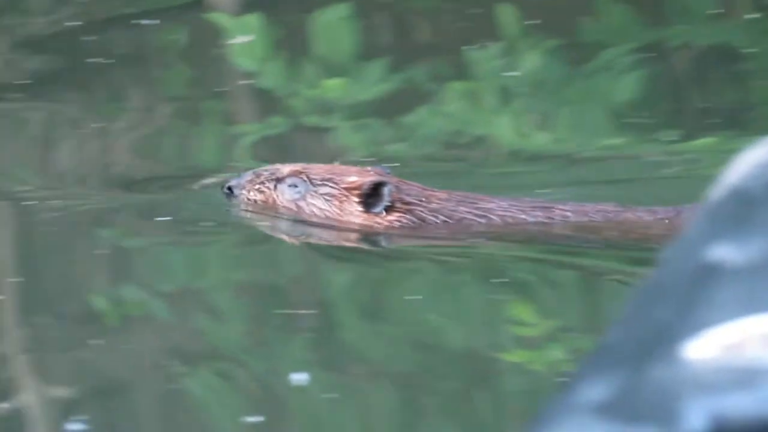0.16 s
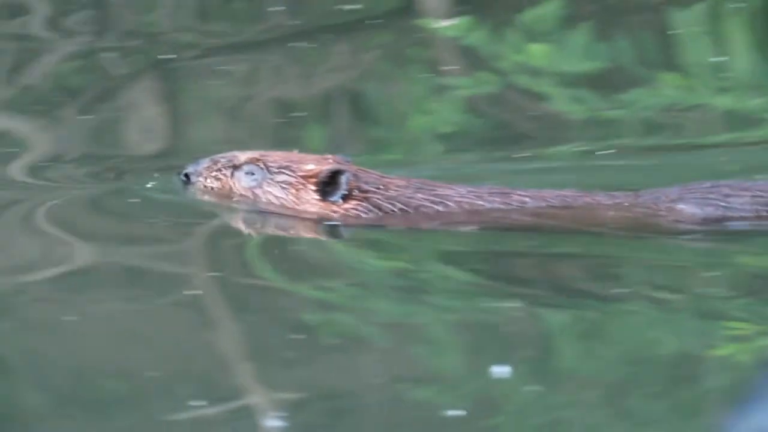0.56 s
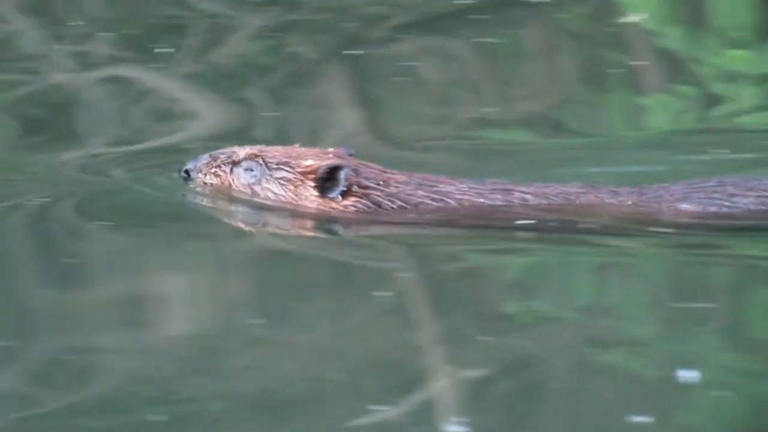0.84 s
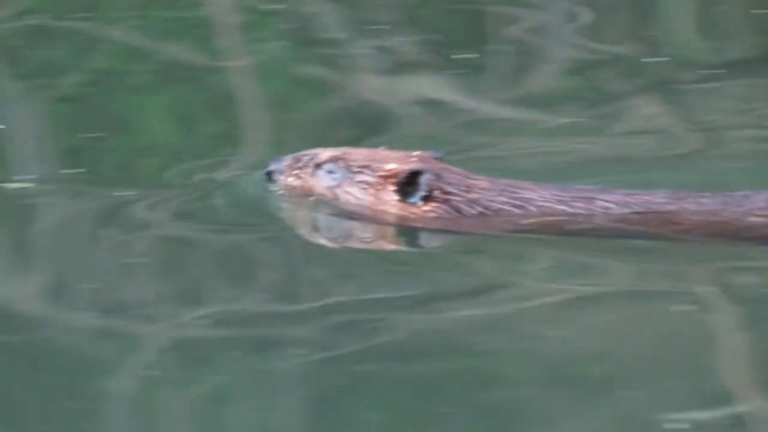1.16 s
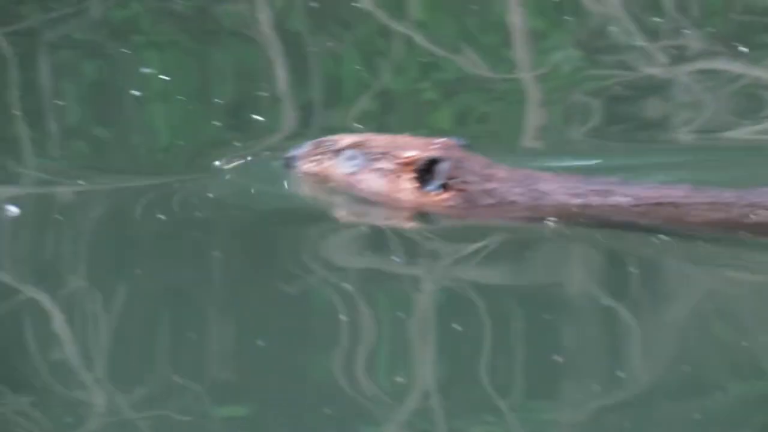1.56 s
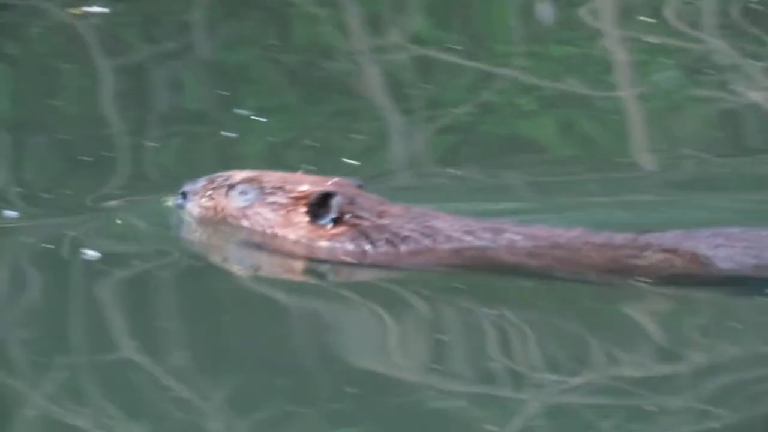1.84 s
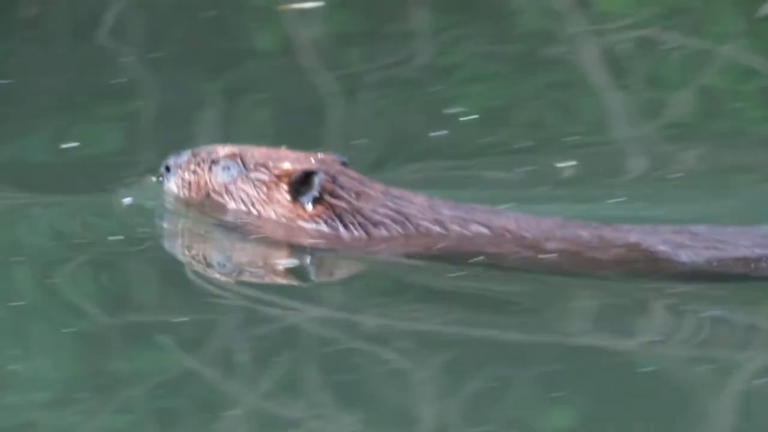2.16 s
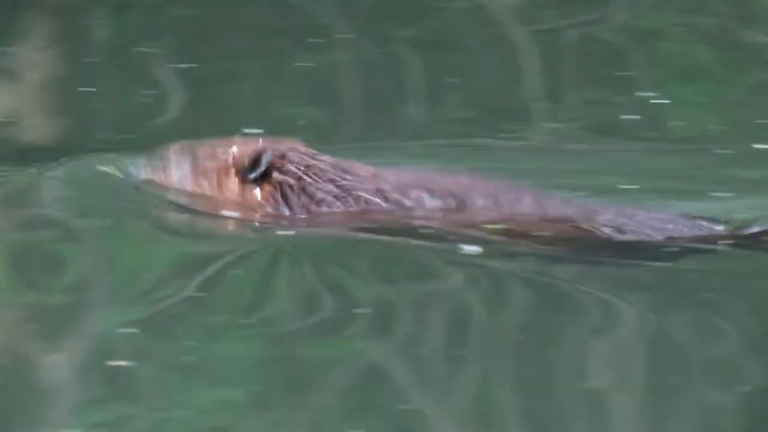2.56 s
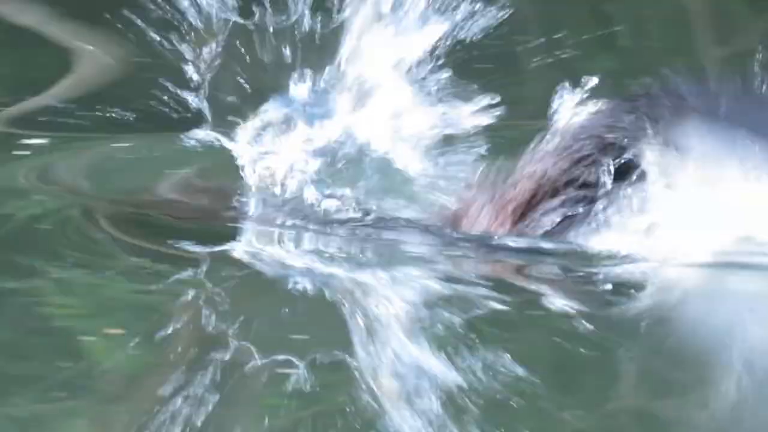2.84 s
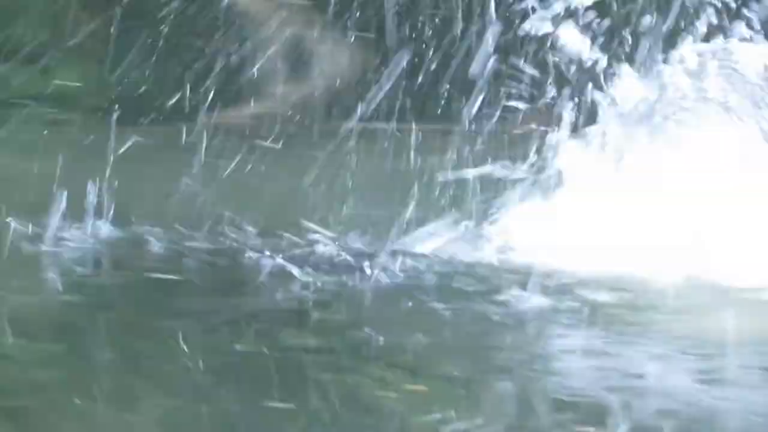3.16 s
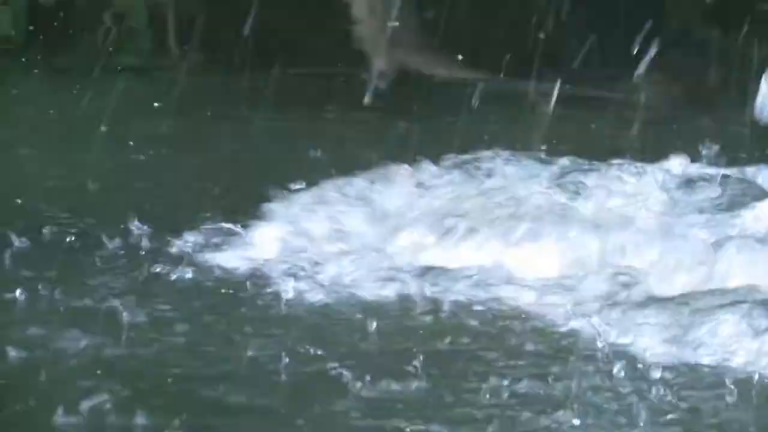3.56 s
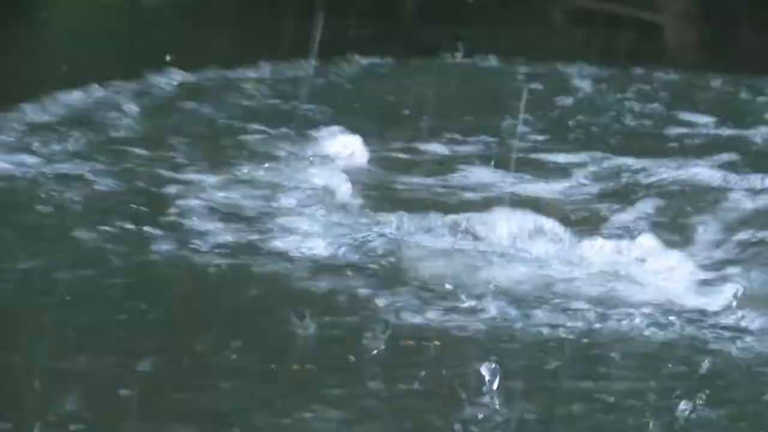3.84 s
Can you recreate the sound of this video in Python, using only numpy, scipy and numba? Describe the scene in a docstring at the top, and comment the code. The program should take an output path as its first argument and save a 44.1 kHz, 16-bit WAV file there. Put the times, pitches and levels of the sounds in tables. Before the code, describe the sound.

A beaver's tail-slap dive on a quiet wooded lake. Until 2.7 s only low hum, soft rumble and hiss, with faint quick bird phrases on the left at 0.7-1.9 s and a tiny water tick at 1.9. Light plops at 2.7, a gulping plunge at 2.9, a very loud, bright smack at 3.07, abruptly dropping; then drops patter and bubbling water swells at 3.45-3.9, thinning by 4.

```python
"""Quiet wooded lake: a beaver dives a few metres from a small camera. Its back breaks the surface, the body
plunges, the tail smacks, and thrown water rains back. Water is decaying sine grains over band noise.
Behind it: harmonic hum, a slowly swelling tone, shaped noise for distant rumble and microphone hiss,
and faint birds as short sines. The camera's limiter ducks the level after the smack."""
import sys
import numpy as np
from scipy import signal
from scipy.fft import rfft, irfft
from scipy.io import wavfile
from scipy.ndimage import uniform_filter1d
from numba import njit

SR = 44100
rng = np.random.default_rng(int(sys.argv[2]) if len(sys.argv) > 2 else 0)


def unload_wav(signal):
    """Save mono or channel-first audio to the path in sys.argv[1] as 16-bit WAV at rate SR, clipped to [-1, 1]."""
    wavfile.write(
        sys.argv[1],
        SR,
        np.round(np.clip(np.atleast_2d(signal).T, -1, 1) * 32767).astype(np.int16),
    )


def nominal_scale(level):
    """Amplitude ratio for a level in decibels (scalar or array-like)."""
    x = np.asarray(level, float) / 20
    return 10 ** x


N = 176400  # samples

# Table levels are relative: trims, pan, echo and limiter follow. Positive pan_db leans left.
# Single bubbles and air pockets: start_s, peak_db, pitch_hz, length_cycles, pitch_rise_share
BUBBLES = [(1.881, -41, 1600, 4.6, 0), (1.8792, -32, 1900, 1.6, -0.5), (2.726, -29, 563, 17, 4.5),
           (2.7585, -16, 1230, 9.1, 0.5), (2.803, -34, 1516, 38, 1.5), (2.864, -33, 708, 30, -0.65),
           (2.9018, -17.5, 292.5, 7.9, -0.45), (2.927, -15, 312, 3.8, 0.3), (2.928, -25, 99.2, 9.5, 0.84),
           (3.672, -25.5, 504, 12.4, 0.5), (3.272, -39.5, 155.2, 18.3, 1), (3.645, -32, 354, 16, 1),
           (3.869, -20, 2014, 20, 1.2)]
# Short rings without pitch rise: tail smacks, drops and some steady bubbles: start_s, peak_db, pitch_hz,
# length_cycles
SHORT_RINGS = [(1.8785, -44, 750, 5), (2.6968, -36.5, 4000, 5.8), (2.7046, -37, 8600, 16),
               (2.7258, -16, 4000, 5.2), (2.733, -29.5, 8300, 11), (2.7328, -26, 1300, 7.8),
               (2.743, -23, 1870, 14), (2.743, -22, 2930, 13), (2.7459, -19.5, 1600, 11),
               (2.7965, -23, 2330, 8.9), (2.908, -15.5, 1120, 19), (2.92, -11, 1560, 11.5),
               (2.935, -9, 1345, 20), (2.942, -11, 2740, 18), (3.0497, -13, 9000, 14), (3.07, 4, 8300, 13),
               (3.0685, -3.5, 11600, 18), (3.07, -3.5, 2200, 4.6), (3.082, 0.5, 2300, 2.5),
               (3.0829, 1, 2900, 2.6), (3.084, 1.5, 5400, 8.6), (3.0875, 0, 1760, 4.5),
               (3.454, -12.5, 10200, 12), (3.6166, -14, 2020, 5), (3.627, -16, 1060, 21), (3.629, -11, 4570, 17),
               (3.71, -16, 1880, 14), (3.923, -18, 1980, 18), (3.673, -9.5, 5300, 12), (3.95, -16, 8950, 20),
               (3.972, -13, 6960, 21)]
# Churned water: time_s, big_bubbles_db, small_bubbles_db, spray_db, fine_spray_db
WATER_LEVELS = [(2.68, -57, -60, -67, -72), (2.735, -53, -52, -60, -67), (2.75, -63, -43, -49.5, -58),
                (2.78, -64, -47.5, -55.5, -69), (2.804, -40, -40.5, -47, -53.5),
                (2.845, -49.5, -41, -41.5, -46), (2.9, -37.5, -38, -46.5, -51),
                (2.908, -29.5, -24.5, -37.5, -44), (2.932, -20, -19, -22.5, -31),
                (2.966, -19.5, -22, -28, -36), (3.015, -26, -25.5, -32, -36), (3.061, -25, -25.5, -26, -28),
                (3.07, -28, -25, -18.5, -20), (3.089, -22, -14, -12.5, -20),
                (3.099, -34, -36.5, -34.5, -34), (3.15, -27, -36.5, -39, -42),
                (3.176, -34.5, -36.5, -36.5, -43.5), (3.27, -30.5, -34, -37, -43),
                (3.47, -35, -29, -32, -40.5), (3.62, -29.5, -27, -30, -35), (3.73, -31.5, -25, -29, -35.5),
                (3.84, -40, -25.5, -30, -33), (3.885, -40.5, -32, -34.5, -40), (4, -48.5, -36, -34, -38.5)]
# Five bubble sizes: low_hz, high_hz, grains_per_s, mean_cycles, pan_db, side_noise_ratio, level_db
BUBBLE_SIZES = [(331, 673, 500, 3, 1, 0.062, -8.5), (580, 1490, 1200, 6.9, -0.5, 0.045, -0.5),
                (1413, 3450, 2200, 5.9, -5, 0.35, 0.5), (4000, 8860, 4000, 16, 3.2, 0.52, 0),
                (8600, 14100, 3700, 14, -3.5, 1, 1)]
# Level column of WATER_LEVELS for each size: column_index
SIZE_COLUMNS = [1, 1, 2, 3, 4]
# Wren-like phrases, two falling chips and a held note: start_s, level_db, held_note_hz
PHRASES = [(.69, -65, 3150), (0.8207, -60, 3070), (0.9469, -57.5, 3080), (1.091, -59, 3120),
           (1.2251, -60, 3000), (1.372, -61, 3000), (1.5234, -61, 2950), (1.6704, -61.5, 2935),
           (1.839, -62, 2990)]
# Thin whistles of further birds: start_s, length_s, level_db, pitch_hz
WHISTLES = [(0.497, 0.16, -75, 3050), (0.817, .03, -70, 5080), (0.937, .035, -65, 5050),
            (2.008, 0.015, -57.5, 2820)]
# Hum partials: harmonic_number, level_db
HUM_PARTIALS = [(1, -57.5), (4, -69.5), (5, -67.5), (6, -67.5), (9, -69.5), (12, -67), (13, -65.5)]
# Swelling tone, last level holds: time_s, level_db
TONE_LEVELS = [(0, -61), (.2, -55.5), (.7, -56), (1.4, -52), (2.7, -51.5)]
# Rumble and hiss spectrum: frequency_hz, density_db_per_hz
AIR_SPECTRUM = [(30, -15), (60, -5), (120, -2), (250, -7), (450, -6.5), (780, -4), (1200, -10), (2000, -17),
                (4000, -21), (8000, -26.5), (15000, -33)]

BUBBLE_SWELL, SMACK_SWELL = 0.23, 0.094  # time to peak, share of nominal length
WASH_DB, SPREAD_DB, SWARM_RISE, SWARM_WIDE_DB, SPURT_DB = 1, 4, 0.11, 1, 1
PATTER_DB, PATTER_SPREAD_DB, PATTER_MAX_DB = 4, 3.5, -12
PATTER_LOW_HZ, PATTER_HIGH_HZ, PATTER_CYCLES, PATTER_WIDE_DB = 2200, 10800, 7, 13.5
BANK_S, BANK_DB = 0.056, -13.5  # scatter off waves and hull
CHIP_GAP_S, CHIP_S, CHIP_TOP_HZ, CHIP_FALL_HZ = 0.019, 0.0146, 3764, 1096
NOTE_AFTER_S, NOTE_S, NOTE_DB = 0.0318, 0.052, -5
BIRD_PAN_DB, WARBLE_SHARE, TREES_S, TREES_DB = 9, 0.012, 0.8, 0
HUM_HZ, TONE_HZ = 60.6, 194.4
AIR_DB, AIR_LEAD_S, AIR_ALIKE_HZ, AIR_ALIKE = -52, 0.00022, 336, 0.093
MIC_LOW_HZ = 40
LIMIT_DB, RATIO, ATTACK_S, RELEASE_S = -14.5, 2.23, 0.0019, 0.9
LEFT_RIGHT = np.array([[1], [-1]])


@njit
def grains(rows, out):
    """Add gliding sines that swell linearly and decay exponentially.

    Rows: start_sample, peak, pitch_hz, cycles, rise, left_gain, right_gain, swell."""
    y = out.copy()
    for r in rows:
        start = int(r[0])
        length = r[3] * SR / r[2]
        phase = 0.
        for i in range(min(int(length * r[7] * 8), y.shape[1] - start)):
            u = i / length
            phase += 2 * np.pi * min(r[2] * (1 + r[4] * u), 16400.) / SR
            v = r[1] * np.sin(phase) * u / r[7] * np.exp(1 - u / r[7])
            y[0, start + i] += v * r[5]
            y[1, start + i] += v * r[6]
    return y


def ring(start_s, peak, pitch_hz, cycles, rise, pan_db, swell):
    """Play columns of settings as stereo grains."""
    left, right = nominal_scale(pan_db / 2), nominal_scale(-pan_db / 2)
    columns = np.broadcast_arrays(start_s * SR, peak, pitch_hz, cycles, rise, left, right, swell)
    return grains(np.array(columns, float).T.copy(), np.zeros((2, N)))


def unit(x):
    """Scale to rms 1."""
    return x / np.sqrt(np.mean(x ** 2))


def band(x, low_hz, high_hz):
    """Band-pass, upper edge at most 20 kHz."""
    sos = signal.butter(2, [low_hz, min(high_hz, 20000)], "band", fs=SR, output="sos")
    return signal.sosfilt(sos, x)


def walk(steps_per_s):
    """Smoothed random steps, rms 1."""
    k = int(SR / steps_per_s)
    steps = np.repeat(rng.standard_normal(N // k + 1), k)
    return unit(uniform_filter1d(uniform_filter1d(steps, k), k)[:N])


def echo(y, t60_s, level_db):
    """Add scatter: an exponentially fading noise tail, unlike left and right."""
    i = np.arange(20000)
    tail = rng.standard_normal((2, 20000)) * np.exp(-np.log(1000) * i / SR / t60_s)
    tail = band(tail, 410, 20500)
    tail = tail / np.sqrt(np.sum(tail ** 2, 1, keepdims=True))
    return y + nominal_scale(level_db) * signal.fftconvolve(y, tail, axes=1)[:, :N]


def pitch_pan_db(pitch_hz):
    """Side lean by pitch: the middle treble leans right."""
    return np.where((pitch_hz > 1350) & (pitch_hz < 3500), -3., .5)


def short_rings():
    """Short, fast-swelling, steady-pitch rings: tail and drops striking the water, and some steady bubbles."""
    start_s, peak_db, hz, cycles = np.array(SHORT_RINGS).T
    return ring(start_s, nominal_scale(peak_db), hz, cycles, 0, pitch_pan_db(hz), SMACK_SWELL)


def bubbles():
    """Lone air pockets ring with slower swell and gliding pitch."""
    start_s, peak_db, hz, cycles, rise = np.array(BUBBLES).T
    return ring(start_s, nominal_scale(peak_db), hz, cycles, rise, pitch_pan_db(hz), BUBBLE_SWELL)


def churn():
    """Five sizes of bubble: swarms of random grains mixed with band noise, in shared spurts."""
    water = np.array(WATER_LEVELS)
    out = np.zeros((2, N))
    first = int(water[0, 0] * SR)
    count = N - first
    t = np.arange(first, N) / SR
    spurt_db = SPURT_DB * walk(60)[first:]
    for (low, high, rate, mean_cycles, pan_db, side, level_db), col in zip(BUBBLE_SIZES, SIZE_COLUMNS):
        when, size, pitch, length, place = rng.random((5, int(rate * count / SR)))
        start_s = (first + when * count) / SR
        peak = nominal_scale(-SPREAD_DB * np.log(np.maximum(size, 10 / low)))
        hz = low * (high / low) ** pitch
        pan = pan_db + SWARM_WIDE_DB * (2 * place - 1)
        swarm = ring(start_s, peak, hz, mean_cycles * (.5 + length), SWARM_RISE, pan, SMACK_SWELL)
        swarm = unit(band(swarm[:, first:], low * 0.62, high * 1.17))
        middle, sides = band(band(rng.standard_normal((2, count)), low, high), low, high)
        fizz = (middle + side * sides * LEFT_RIGHT) * nominal_scale(pan_db * LEFT_RIGHT / 2)
        mix = unit(swarm + nominal_scale(WASH_DB) * unit(fizz))
        out[:, first:] += mix * nominal_scale(np.interp(t, water[:, 0], water[:, col]) + level_db + spurt_db)
    return out


def patter():
    """Lone falling drops: 400 short random rings following the spray level."""
    water = np.array(WATER_LEVELS)
    when, size, pitch, length, place = rng.random((5, 400))
    start_s = water[0, 0] + when * (N - int(water[0, 0] * SR)) / SR
    peak_db = np.interp(start_s, water[:, 0], water[:, 3]) + PATTER_DB
    peak_db = peak_db - PATTER_SPREAD_DB * np.log(np.maximum(size, .03))
    peak = nominal_scale(np.minimum(peak_db, PATTER_MAX_DB))
    hz = PATTER_LOW_HZ * (PATTER_HIGH_HZ / PATTER_LOW_HZ) ** pitch
    pan_db = PATTER_WIDE_DB * (2 * place - 1)
    return ring(start_s, peak, hz, PATTER_CYCLES * (0.25 + length), 0, pan_db, SMACK_SWELL)


def birds():
    """Wavering sine chips, notes and whistles under half-sine envelopes, smeared by the trees."""
    y = np.zeros(N)
    warble = 1 + WARBLE_SHARE * walk(200)
    notes = [(s, length_s, db, hz, hz) for s, length_s, db, hz in WHISTLES]
    for s, db, hz in PHRASES:
        for gap_s in (0, CHIP_GAP_S):
            notes.append((s + gap_s, CHIP_S, db, CHIP_TOP_HZ, CHIP_TOP_HZ - CHIP_FALL_HZ))
        notes.append((s + NOTE_AFTER_S, NOTE_S, db + NOTE_DB, hz * 1.01, hz))
    for s, length_s, db, from_hz, to_hz in notes:
        i, k = int(s * SR), int(length_s * SR)
        hz = np.linspace(from_hz, to_hz, k) * warble[i:i + k]
        envelope = nominal_scale(db + 3.5) * np.sin(np.pi * np.arange(k) / k)
        y[i:i + k] += envelope * np.sin(2 * np.pi * np.cumsum(hz) / SR)
    y = y * nominal_scale(2 * walk(150))
    return echo(np.array([y, y]), TREES_S, TREES_DB) * nominal_scale(BIRD_PAN_DB * LEFT_RIGHT / 2)


def hum():
    """Harmonics of one slightly wandering fundamental, each with its own level drift."""
    phase = 2 * np.pi * np.cumsum(HUM_HZ * (1 + 0.00146 * walk(2.04))) / SR
    return sum(nominal_scale(db + 3.5 + walk(6.05)) * np.sin(k * phase + 6 * rng.random()) for k, db in HUM_PARTIALS)


def tone():
    """One swelling sine with wandering pitch and level."""
    level_db = np.interp(np.arange(N) / SR, *np.array(TONE_LEVELS).T) + 3 + 1.25 * walk(9.16)
    hz = TONE_HZ * (1 + 0.0023 * walk(3.05))
    return nominal_scale(level_db) * np.sin(2 * np.pi * np.cumsum(hz) / SR)


def air_spectrum(f_hz):
    """Rumble and hiss: shaped noise, weakly alike on both sides in the bass, less above."""
    points_hz, density_db = np.array(AIR_SPECTRUM).T
    shape = nominal_scale(np.interp(np.log(f_hz), np.log(points_hz), density_db))
    alike = AIR_ALIKE / (1 + (f_hz / AIR_ALIKE_HZ) ** 2)  # correlation of the sides
    middle, sides = rfft(rng.standard_normal((2, N)))
    air = shape * (np.sqrt(1 + alike) * middle + np.sqrt(1 - alike) * sides * LEFT_RIGHT)
    return air * nominal_scale(AIR_DB) / np.sqrt(np.mean(irfft(air, N) ** 2))


def distance():
    """Hum, tone and air reach the left first, slightly louder; their level drifts together."""
    f_hz = np.maximum(np.fft.rfftfreq(N, 1 / SR), 1)
    far = air_spectrum(f_hz) + rfft(hum() + tone())
    lead = np.exp(2j * np.pi * f_hz * AIR_LEAD_S * np.array([[1], [0]]))
    return irfft(far * lead, N) * nominal_scale(.6 * LEFT_RIGHT + .5 * walk(3.12))


def scene():
    """Near water with its scatter, then birds and far sounds."""
    water = short_rings() + bubbles() + churn() + patter()
    return echo(water, BANK_S, BANK_DB) + birds() + distance()


@njit
def follow(x, attack, release):
    """Peak follower with separate rise and fall coefficients per sample."""
    e, y = 0., np.empty(len(x))
    for i in range(len(x)):
        e += (x[i] - e) * (attack if x[i] > e else release)
        y[i] = e
    return y


def limiter(x):
    """Cut both sides by the louder one's envelope above threshold; quick down, slow back."""
    envelope = follow(np.abs(x).max(0), 1 / (ATTACK_S * SR), 1 / (RELEASE_S * SR))
    return x * np.minimum(1, (nominal_scale(LIMIT_DB) / (np.abs(envelope) + 1e-9)) ** (1 - 1 / RATIO))


def roll_off(x):
    """The treble ends steeply here."""
    return signal.sosfilt(signal.butter(12, 16510, fs=SR, output="sos"), x)


def record(dry):
    """Microphone high-pass, limiter, then clipping at full scale."""
    sos = signal.butter(2, MIC_LOW_HZ, "high", fs=SR, output="sos")
    mix = np.clip(limiter(signal.sosfilt(sos, dry)), -1, 1)
    return roll_off(mix)


dry = scene()
out = record(dry)
unload_wav(out)
```